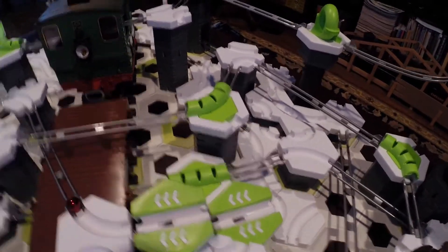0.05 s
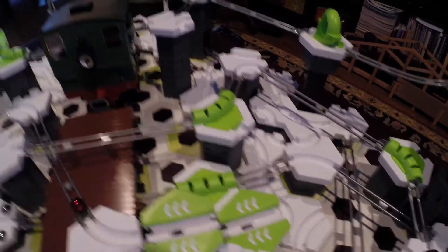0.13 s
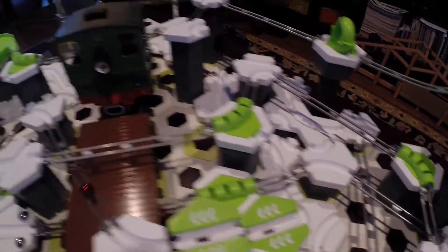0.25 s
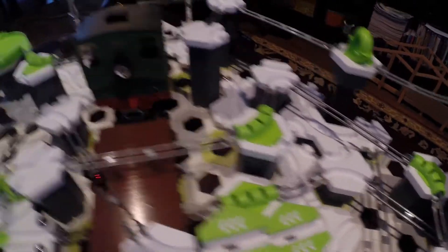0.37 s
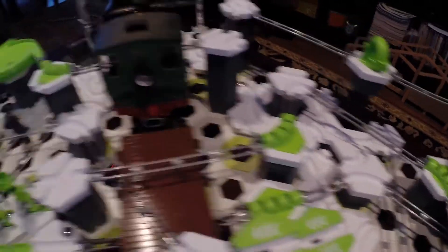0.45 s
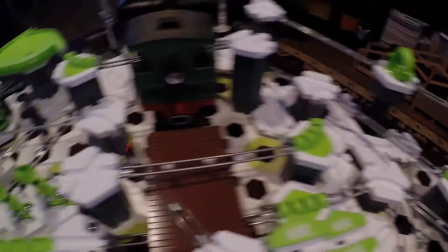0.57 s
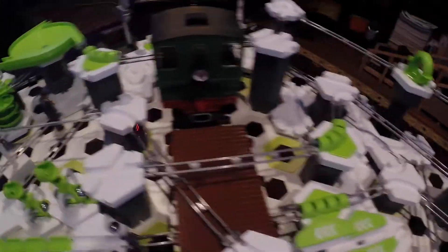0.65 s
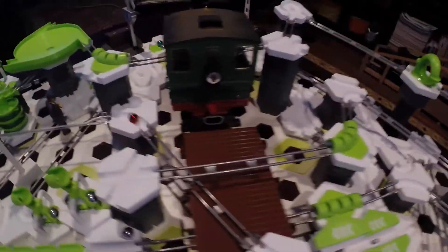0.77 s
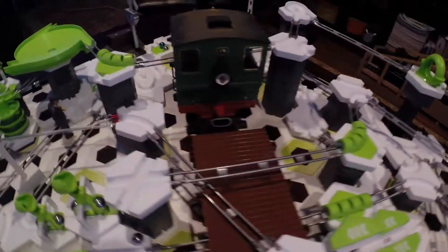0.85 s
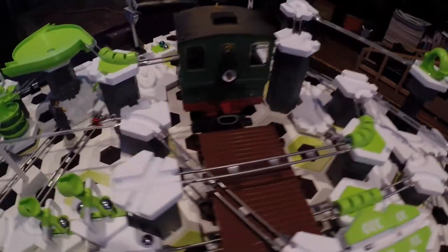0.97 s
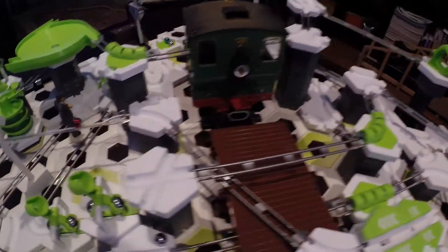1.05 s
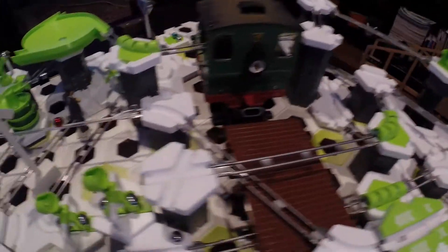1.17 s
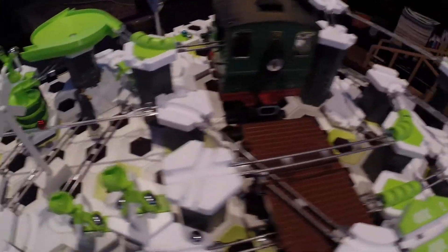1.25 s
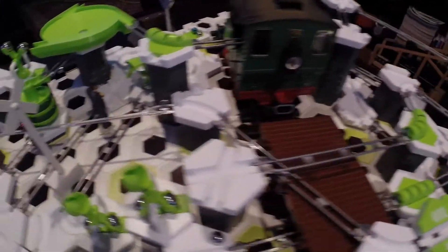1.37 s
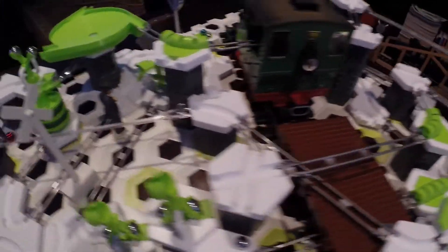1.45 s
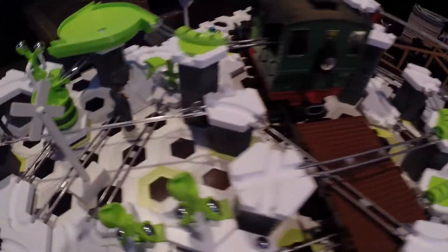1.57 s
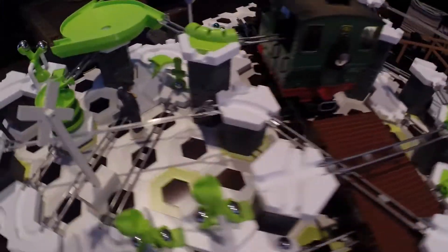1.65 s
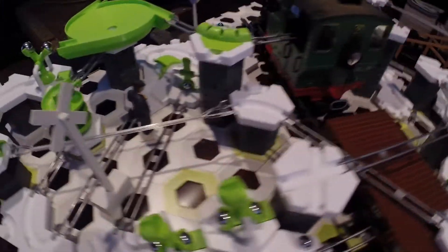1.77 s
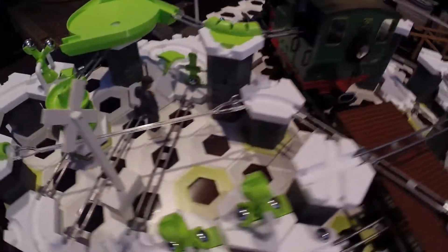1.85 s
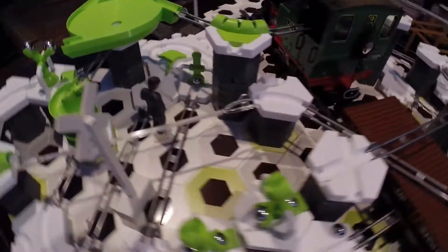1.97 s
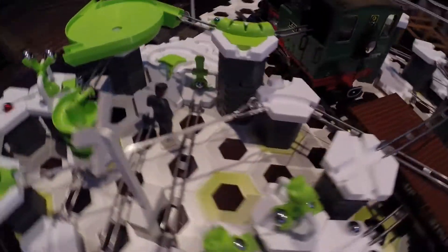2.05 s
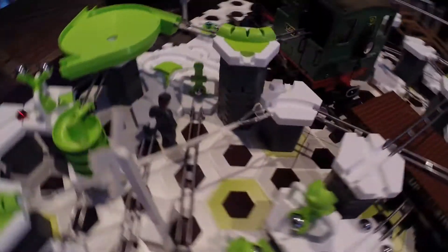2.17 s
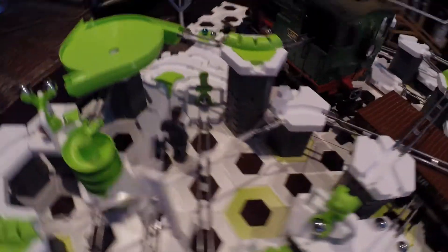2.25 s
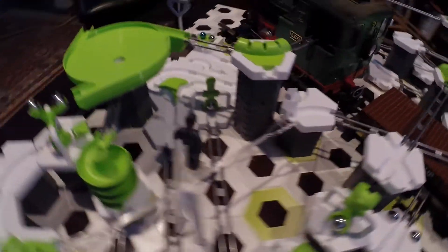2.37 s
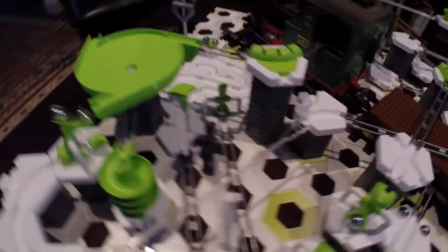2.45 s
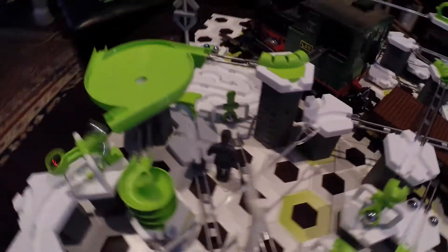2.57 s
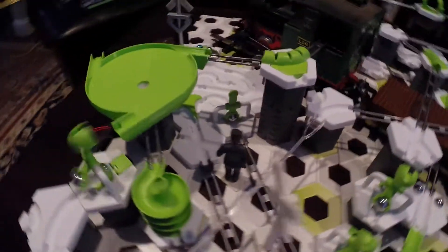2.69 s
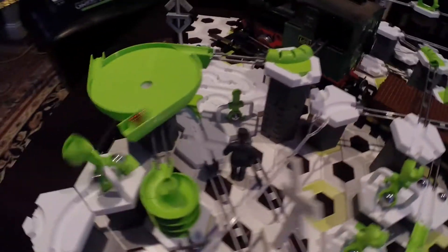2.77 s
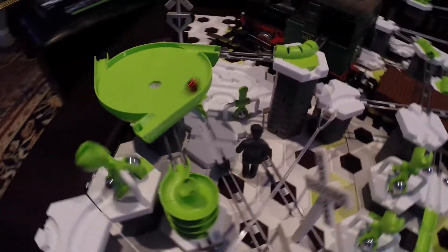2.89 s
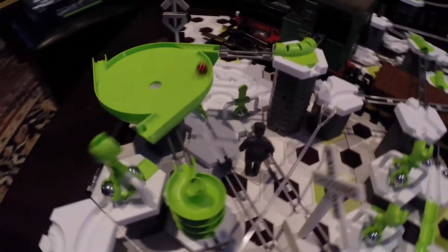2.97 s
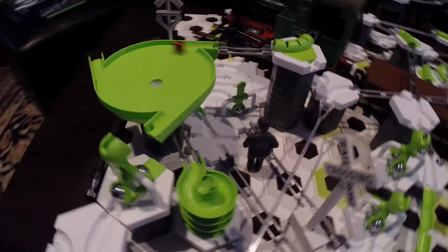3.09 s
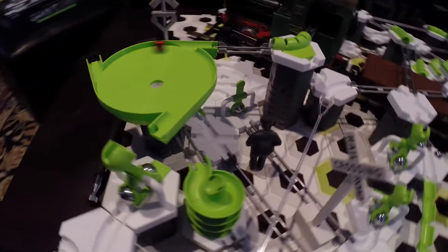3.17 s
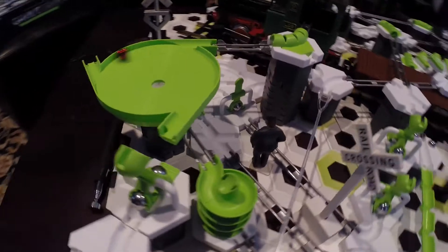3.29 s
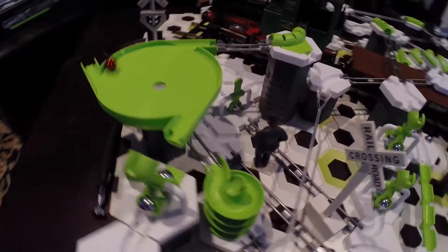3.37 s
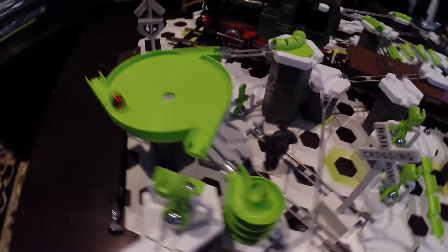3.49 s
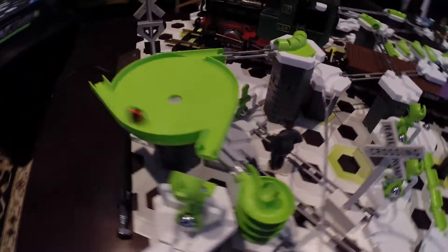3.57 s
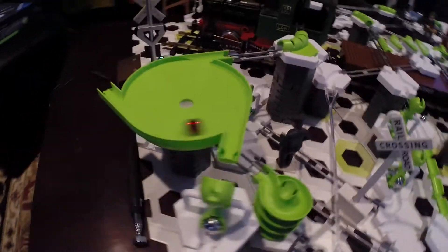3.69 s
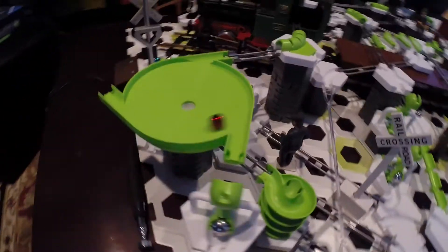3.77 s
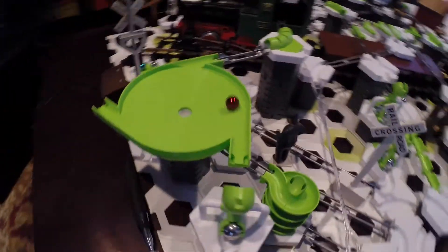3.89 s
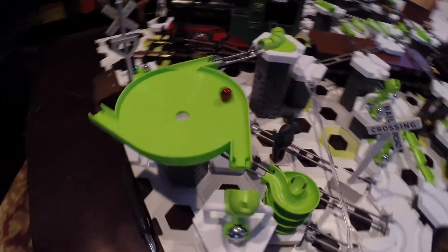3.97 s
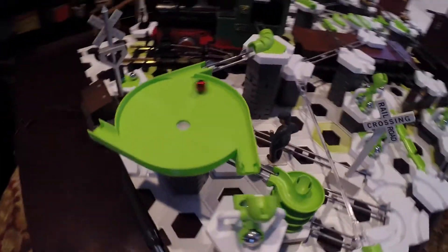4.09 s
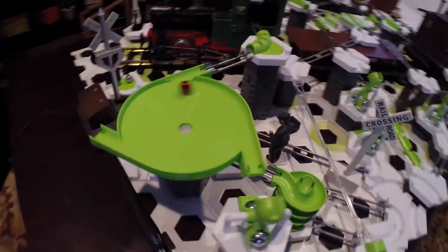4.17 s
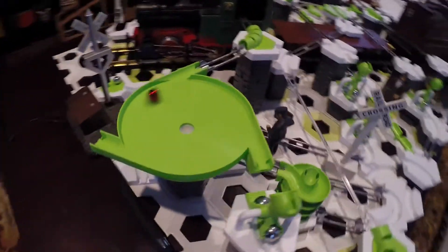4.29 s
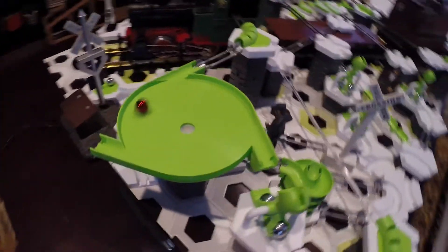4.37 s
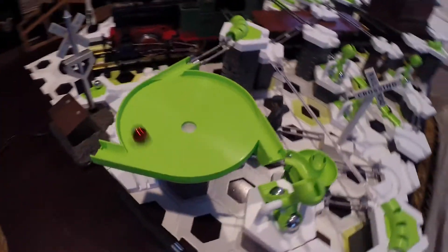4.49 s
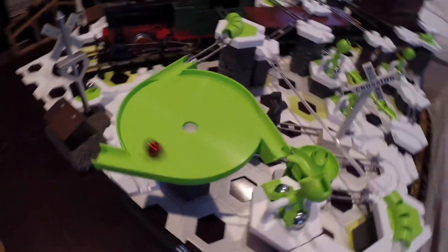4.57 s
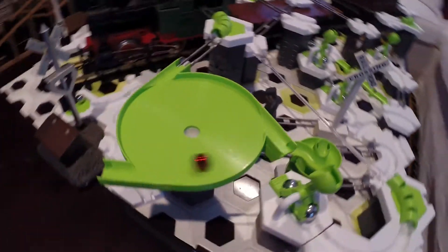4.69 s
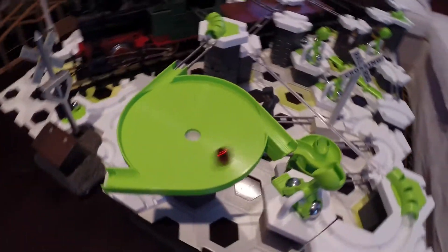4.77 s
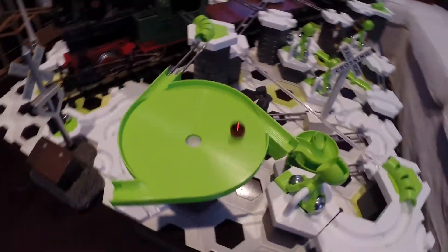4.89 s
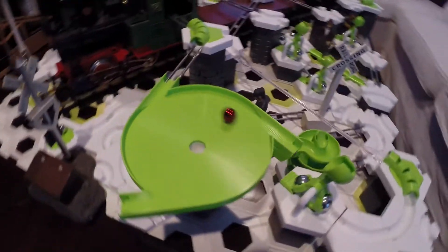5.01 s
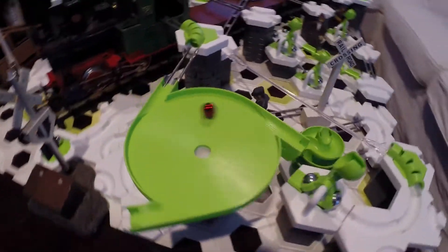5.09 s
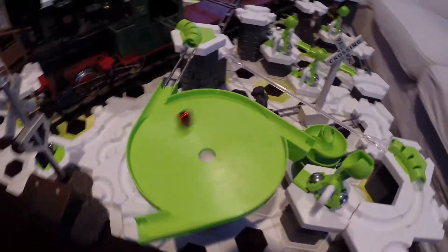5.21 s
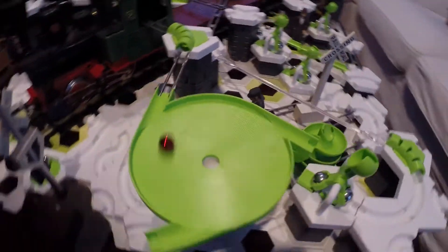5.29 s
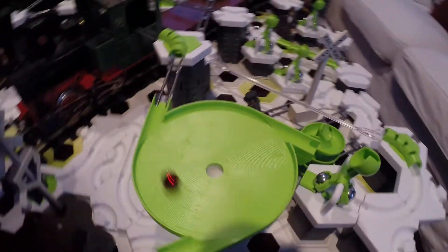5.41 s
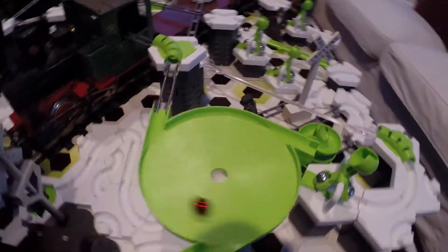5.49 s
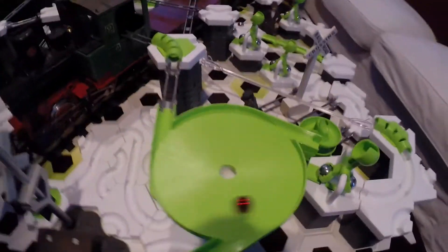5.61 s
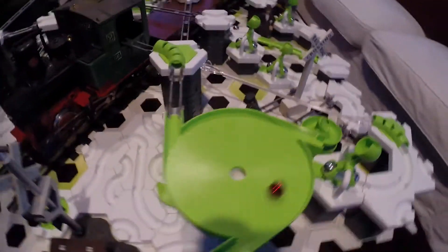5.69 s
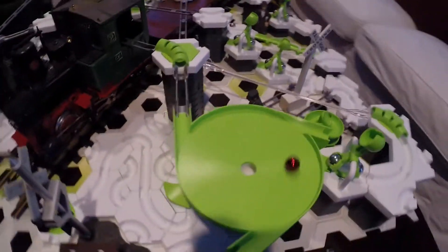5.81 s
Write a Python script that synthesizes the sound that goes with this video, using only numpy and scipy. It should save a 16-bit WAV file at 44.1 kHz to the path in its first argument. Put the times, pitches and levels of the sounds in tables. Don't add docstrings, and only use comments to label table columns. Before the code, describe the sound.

A quiet furnished room with faint low room tone and hiss, heard closely through a small camera microphone. From 0 to 0.9 s a marble rolls lightly over wire rails, with thin rattle and irregular hard clicks, the strongest near 0.15, 0.25 and 0.73 s. After one more click at 0.94 s it becomes a faint roll until about 1.6 s, when small dry taps cross plastic tiles. Between 2.25 and 2.8 s lifting arms clatter brightly, with a sharp snap at 2.39 s and small hollow thumps. At 2.81 s comes by far the loudest sound, a short dry crack into a plastic bowl. The marble then circles in a grainy whirr of rapid tiny skips, hollow bowl tone and thin ringing, roughest around 3.2 and 3.85 s, pulsing with each lap. It eases around 4.4 to 4.7 s, chatters again near 5 s, then continues more softly and less brightly to 6 s.

```python
import sys
import numpy as np
from scipy import signal
from scipy.fft import rfft, irfft
from scipy.io import wavfile
from scipy.ndimage import uniform_filter1d

SR = 44100
rng = np.random.default_rng(int(sys.argv[2]) if len(sys.argv) > 2 else 0)


def invert_db(x):
    u = np.asarray(x, float) / 20
    return 10 ** u


def store_pcm(level_fs):
    pcm = np.round(np.clip(level_fs, -1, 1) * 32767).astype(np.int16)
    wavfile.write(sys.argv[1], SR, np.atleast_2d(pcm).T)


N = 257984

# pitch_hz, density_db [dB per Hz]
AIR_SPECTRUM = [(12, -7), (20, 7.5), (134, -2), (444, -5.5), (821, -7.5), (918, -19.5), (1280, -6.5),
                (1560, -12), (2240, -17.5), (4030, -16), (5480, -22), (12300, -36.5), (15800, -38)]

# pitch_hz, width_hz, level_db
NEAR_RAIL_MODES = [(783, 79, -9), (1280, 180, -9.5), (1750, 120, 5), (2150, 33, 13.5), (2670, 140, 12),
                   (3900, 42, -22), (4700, 180, -7)]
FAR_RAIL_MODES = [(795, 28, -8.5), (1410, 610, -3.5), (2150, 300, -7), (3440, 110, -3), (4450, 83, -17),
                  (5630, 170, -4)]
TILE_MODES = [(770, 230, -1.5), (1420, 170, -3), (1640, 290, -4), (3670, 78, -11), (4940, 170, -32),
              (5820, 58, -30)]
ARM_MODES = [(2240, 95, -8), (3700, 330, 1), (4500, 110, -20), (7100, 900, -6)]
BODY_CHANGES_S = (0.88, 1.63, 1.836, 2.357)
# start_s, level_db
ROLLING_LEVEL = [(0.0, -50), (0.21, -62), (0.33, -58), (0.51, -53.5), (0.68, -53), (0.76, -52.5),
                 (0.9, -47), (1.0, -53.5), (1.5, -55.5), (1.77, -51), (2.0, -56.5), (2.28, -51),
                 (2.42, -53), (2.49, -63), (2.57, -59), (2.61, -83), (2.71, -72), (2.803, -59)]
# rumble_db, ring_db, fizz_db
ROLLING_COLOURS = [
    (2, 2, -12),
    (-6, -3, -11.5),
    (-2.5, -6, -2),
    (4, -3, -26),
    (9, -1, 10),
]

# start_s, peak_db, pitch_hz, extra_brightness_db
RAIL_JOINTS = [(0.0185, -32, 2140, -21), (0.0556, -31, 2080, -19), (0.1012, -37, 2010, 0),
               (0.1446, -23.5, 4300, -5), (0.173, -36.5, 2570, -3), (0.2418, -21, 2560, -2),
               (0.26, -27.5, 2150, -1), (0.2725, -27, 2710, -2), (0.355, -33, 2210, -5),
               (0.466, -34, 2300, -3), (0.494, -30.5, 2620, -13), (0.5216, -30, 2240, -12),
               (0.568, -36, 2150, 0), (0.6664, -32, 2160, -7), (0.724, -19.5, 2450, -4),
               (0.728, -17, 2150, -10), (0.7475, -20, 2240, -2), (0.7842, -27, 2250, 2),
               (0.8976, -36.5, 2550, 3), (0.9409, -22, 2240, 5.5), (0.949, -31.5, 2240, 21),
               (1.04, -40.5, 2240, 33), (1.296, -44, 3530, 42)]
TILE_EDGES = [(1.6458, -31.5, 1700, 5), (1.68, -28, 1550, 2), (1.686, -31.5, 2580, 3),
              (1.734, -36.5, 2670, 3), (1.766, -29.5, 2600, 8), (1.8031, -25, 3700, 2),
              (1.839, -33.5, 1570, 0), (1.887, -33, 1620, -19), (1.909, -37, 1640, -9),
              (1.938, -51, 1500, -9), (1.981, -39, 1720, -9), (2.036, -29.5, 865, 0),
              (2.089, -36.5, 1880, -10), (2.173, -39, 1490, -1)]
ARM_HITS = [(2.2458, -24.5, 3730, -18), (2.2618, -26, 2170, -4), (2.3417, -41.5, 3320, 27),
            (2.36, -18, 3480, -19), (2.364, -27.5, 3670, 9), (2.3895, -17.5, 3800, -5),
            (2.4104, -22, 3700, 2), (2.4207, -27, 3900, -4), (2.4292, -27, 3040, 1),
            (2.5026, -33.5, 3700, 0), (2.5125, -25, 1960, -11), (2.5143, -23.5, 3700, -14),
            (2.5443, -27, 3700, -9), (2.5592, -31, 6650, -2), (2.7252, -22, 3620, -0.5),
            (2.762, -30, 3540, 5), (2.775, -37, 2000, 21)]
# low_share_db [at -38.5 dB peak], high_share_db [at -28 dB peak], t60_s
KNOCK_TIMBRES = [
    (-10, -26.5, 0.096),
    (-11, -23, 0.087),
    (-7.5, -15, 0.074),
]
# start_s, peak_db, pitch_hz, t60_s
ARM_BASE_THUMPS = [(2.359, -32.5, 374, 0.039), (2.391, -38, 540, 0.075), (2.424, -37.5, 287, 0.048),
                   (2.515, -50, 395, 0.039), (2.522, -36, 562, 0.039), (2.551, -48, 500, 0.11)]
# start_s, peak_db, low_pitch_hz, high_pitch_hz, width_hz
CATCH_SNAP = (2.3893, -10, 3660, 4040, 260)

# start_s, peak_db
BOWL_LANDING = [(2.8116, -.5)]
# pitch_hz, level_db, t60_s
BOWL_LANDING_MODES = [(145, -31.5, 0.51), (754, 2.5, 0.014), (990, -15, 0.041), (1130, -30, 0.2),
                      (1610, -6.5, 0.036), (1686, -7, 0.062), (2000, -40, 0.049), (2740, 0, 0.043),
                      (2550, 7.5, 0.016), (2920, 12.5, 0.018), (2880, -42, 0.039), (3410, 2, 0.035),
                      (3530, -1, 0.035), (5240, -22, 0.04), (4390, 14, 0.012), (6000, -17, 0.059),
                      (6730, -11, 0.026), (7870, -12, 0.044)]

# pitch_hz, width_hz, level_db
DISH_MODES = [(473, 150, 4), (720, 25, 3), (778, 56, 4.5), (961, 31, 10), (1042, 63, 7.5), (1490, 330, 4.5)]
RING_MODES = [(1704, 94, 9), (1737, 165, 0.78)]
RIM_MODES = [(2386, 140, -4), (2478, 46, 3.5), (2608, 75, 2), (2710, 145, -2), (2010, 1100, -15),
             (2860, 260, -5.5), (3170, 85, -4.5), (3310, 71, -10), (3535, 87, -6.5)]
FIZZ_MODES = [(4160, 150, 1), (8750, 350, -10), (4446, 124, -2), (5310, 100, -4), (5830, 99, -12.5),
              (6170, 85, -7.5), (6910, 380, -8.5), (7440, 890, -9.5), (8050, 660, -15), (9850, 700, -19.5),
              (6840, 2200, -2)]
TOWER_MODES = [(130.5, 32, 3), (157, 18, -1), (240.5, 9.2, -15)]
# start_s, level_db
RIM_PRESSURE = [(2.9, -38), (3.07, -37), (3.3, -39), (3.47, -41), (3.62, -39.5), (3.75, -41.5),
                (3.86, -41.5), (4.02, -48), (4.12, -44), (4.48, -45), (4.66, -51), (4.76, -40), (5.04, -42),
                (5.13, -43.5), (5.25, -38.5), (5.58, -46), (5.68, -47.5), (5.8, -38.5)]
# level_db, slope [dB per dB of pressure], drift [dB per s]
DISH_FOLLOW = (-41.5, 0.26, 0.6)
RING_FOLLOW = (-37, 0.74, 0.09)
FIZZ_FOLLOW = (-57.5, 1.17, -0.36)
STILL_LINE_TIMES_S = (2.62, 2.89, 3.13, 3.46, 3.84, 4.3, 4.62, 4.96, 5.32, 5.64, 6.0)
SPIRAL_DRIFT = -3.0, -2.5, 2.2
JOLTS_S = (3.204, 3.407, 3.468, 3.488, 3.833, 3.929, 4.066, 4.241, 4.314, 4.601, 4.949, 5.146, 5.248, 5.309,
           5.826)
# start_s, thud_db, rim_ring_db
SPIRAL_HOPS = [(2.8702, -20, -46), (2.8737, -39, -43), (2.9282, -35, -31), (2.9401, -28, -27),
               (2.951, -49, -34), (2.995, -44, -36), (2.999, -29.5, -47), (3.0135, -39, -38),
               (3.0189, -33, -28), (3.0236, -33, -40), (3.0277, -23.5, -25.5), (3.0467, -32, -23),
               (3.0595, -42, -22), (3.064, -35, -44), (3.075, -32, -26), (3.0818, -22.5, -20),
               (3.0863, -23, -26.5), (3.0913, -24, -31), (3.0961, -23, -53), (3.1189, -21.5, -26),
               (3.1331, -23, -48), (3.1492, -24, -29), (3.157, -20, -39), (3.2005, -23, -27.5),
               (3.2064, -17.5, -21.5), (3.2114, -25, -30), (3.2199, -14.5, -12.5), (3.2239, -36, -21),
               (3.23, -28, -48), (3.2489, -31.5, -26), (3.2582, -19, -17), (3.2707, -42, -30.5),
               (3.2747, -25, -32), (3.2954, -31, -27.5), (3.3066, -29, -23), (3.3149, -24, -24),
               (3.3213, -39, -33), (3.3253, -27, -25.5), (3.333, -22, -22), (3.3405, -21, -51),
               (3.3443, -28, -28.5), (3.4085, -22.5, -44.5), (3.4168, -34, -25), (3.4392, -27, -32),
               (3.4899, -26, -53), (3.5192, -21, -29), (3.5323, -25, -35), (3.5396, -36, -31),
               (3.5516, -35, -43), (3.6023, -36, -39), (3.62, -41, -35), (3.624, -22, -28),
               (3.628, -34, -34), (3.6321, -30, -35), (3.6556, -26, -41), (3.6609, -27, -34),
               (3.6766, -26.5, -30.5), (3.7876, -26, -30), (3.804, -28, -28), (3.8354, -18.5, -15.5),
               (3.843, -22.5, -26), (3.8469, -25.5, -33), (3.8538, -19, -23), (3.8568, -27.5, -47),
               (3.861, -25, -28), (3.865, -22.5, -35), (3.8714, -28, -24), (3.873, -23, -27),
               (3.8777, -22, -27.5), (3.8839, -31, -27), (3.888, -25, -35), (3.892, -31, -28),
               (3.8957, -22, -35), (3.8995, -30, -38), (3.9042, -33, -38), (3.9299, -23, -28.5),
               (3.9328, -26, -47), (3.9486, -29, -32), (3.9513, -46, -32.5), (4.005, -27.5, -31.5),
               (4.0662, -34, -30.5), (4.0836, -39, -43), (4.0849, -26, -22.5), (4.0891, -27, -51),
               (4.0951, -28, -49), (4.0976, -31, -25), (4.1122, -22.5, -26), (4.1191, -26.5, -31),
               (4.147, -32, -41), (4.1565, -23.5, -28), (4.2118, -29, -53), (4.2415, -22.5, -28),
               (4.2667, -22, -27), (4.3162, -30, -35), (4.3214, -21.5, -32), (4.3256, -32, -26),
               (4.3328, -20.5, -32), (4.3395, -26.5, -36), (4.3439, -25, -25.5), (4.3479, -21, -31.5),
               (4.351, -25, -25), (4.3546, -21, -23), (4.357, -25, -37), (4.3731, -31, -33),
               (4.4676, -31, -37), (4.4844, -35.5, -31), (4.4868, -22.5, -32.5), (4.497, -33, -31),
               (4.5641, -28, -39), (4.603, -39, -37), (4.7147, -34, -38), (4.7719, -26, -25.5),
               (4.793, -25, -36), (4.822, -46, -36), (4.879, -24, -37), (4.888, -39, -34),
               (4.9112, -24, -32), (4.9497, -23.5, -21.5), (4.956, -22.5, -21.5), (4.9615, -27, -32.5),
               (4.9675, -21, -34), (4.9721, -21, -32), (4.9773, -22, -50), (4.9816, -23, -32),
              (4.9897, -23, -32), (4.9939, -22, -32), (4.9985, -22, -35), (5.0059, -23, -33),
              (5.01, -22, -30), (5.014, -22, -29), (5.0199, -22, -37), (5.0247, -22, -27),
              (5.0305, -19, -35), (5.0365, -20, -24), (5.0423, -19, -50), (5.0493, -19, -27),
              (5.0541, -26, -26), (5.0734, -21, -29), (5.0907, -22, -29), (5.1472, -21, -28),
              (5.1512, -25, -42), (5.2001, -23, -32), (5.2088, -25, -40), (5.2131, -22, -27),
              (5.2183, -22, -30), (5.2413, -24, -40), (5.2495, -22, -27), (5.2544, -24, -32),
              (5.2594, -25, -38), (5.2935, -25, -50), (5.3099, -21, -29), (5.3144, -23, -37),
              (5.364, -25, -40), (5.3775, -34, -32), (5.3893, -25, -50), (5.4017, -23, -35),
              (5.4117, -23, -37), (5.467, -24, -45), (5.4946, -25, -37), (5.5167, -24, -38),
              (5.5301, -27, -35), (5.5338, -25, -50), (5.5375, -22, -32), (5.5426, -24, -38),
              (5.5511, -29, -34), (5.592, -26, -40), (5.605, -24, -37), (5.6083, -25, -40),
              (5.6268, -27, -44), (5.6357, -25, -42), (5.6404, -36, -35), (5.6441, -26, -38),
              (5.7497, -25, -40), (5.7884, -26, -40), (5.7967, -25, -39), (5.802, -26, -36),
              (5.8061, -26, -37), (5.8269, -24, -41), (5.8346, -25, -35), (5.8416, -28, -35),
               (4.41, -36, -47), (4.439, -50, -55), (4.475, -22, -34), (4.518, -30, -34.5),
             (4.5285, -38, -31), (4.5677, -25, -43), (4.6074, -25.5, -40), (4.6395, -28, -37),
             (4.6992, -40, -57), (4.723, -31, -31), (4.7393, -40, -34), (4.7613, -24, -34),
             (4.7774, -34, -29), (4.7953, -31, -30), (4.829, -27, -34), (4.856, -27, -34),
             (4.8635, -42, -33), (4.8903, -26, -28), (4.8926, -17, -44), (4.9281, -26.5, -33),
             (4.9848, -29, -33), (5.001, -27.5, -40), (5.0785, -24, -37), (5.0945, -24.5, -48),
             (5.19, -33, -32), (5.1955, -21.5, -32), (5.2722, -33, -39), (5.2908, -20.5, -34),
             (5.302, -29, -35), (5.349, -26, -39), (5.3735, -23, -35), (5.394, -35, -30.5),
             (5.4228, -24, -37), (5.44, -38, -40), (5.528, -31, -29.5), (5.566, -29, -37),
             (5.7129, -29, -32), (5.7298, -24.5, -47), (5.7585, -32, -42), (5.7688, -40, -31.5)]
IN_BOWL_S = 2.84

# start_s, peak_db, pitch_hz
SETTLING_TICKS = [(2.945, -40.5, 7960), (3.044, -40, 8350), (3.0698, -32, 7900), (3.074, -44, 12000),
                  (3.1822, -49, 13500), (3.208, -35.5, 7860), (3.222, -51, 11880), (3.403, -47, 8700),
                  (4.4417, -46, 12500), (4.498, -39.5, 7000)]


def level(x, db):
    return x * invert_db(db) / np.sqrt(np.mean(x ** 2))


def peak(x, db):
    return x * invert_db(db) / np.abs(x).max()


def add(out, s, sound):
    i = int(s * SR)
    out[i:i + len(sound)] += sound[:N - i]


def curves(table):
    s, *columns = np.transpose(table)
    return [np.interp(np.arange(N) / SR, s, c) for c in columns]


def walk(rate):
    k = int(SR / rate)
    held = np.repeat(rng.standard_normal(N // 20)[:N // k + 1], k)
    return 2.7 * uniform_filter1d(uniform_filter1d(held, k), k)[:N]


def decay_width(t60):
    return np.log(1000) / np.pi / t60


def mode(x, hz, width):
    pole = np.exp((2j * hz - width) * np.pi / SR)
    return signal.lfilter([1], [1, -pole], x).imag


def soften(x, contact_s):
    keep = np.exp(-1 / (contact_s * SR))
    return signal.lfilter([(1 - keep) ** 2], [1, -2 * keep, keep ** 2], x)


def ring(force, db, modes, wander_db, wander_rate, blows=0, fade_db=0, grow_db=0):
    gains = [(-1) ** k * invert_db(m[2]) * np.sqrt(m[1]) for k, m in enumerate(modes)]
    power = sum(g ** 2 * SR / (4 * np.pi * m[1]) for g, m in zip(gains, modes))
    drive = force * invert_db(db) / np.sqrt(power) + blows / np.sqrt(np.sum(np.square(gains)))
    out = 0
    for k, (gain, (hz, width, _)) in enumerate(zip(gains, modes)):
        drift_db = fade_db * (k < 2) + grow_db * (k == 2)
        out = out + gain * mode(drive * invert_db(wander_db * walk(wander_rate) + drift_db), hz, width)
    return out


def air():
    hz = np.fft.rfftfreq(N, 1 / SR)
    table_hz, table_db = np.transpose(AIR_SPECTRUM)
    shape = invert_db(np.interp(np.log(hz + 1), np.log(table_hz), table_db))
    return level(irfft(rfft(rng.standard_normal(N)) * shape, N), -57)


def skips(rate, uneven, scatter_db, grit_db):
    chance = rng.standard_normal((N // 40, 2))
    turns = np.cumsum(rate) / SR
    gaps = np.exp(uneven * chance[:, 0] - uneven ** 2 / 2)
    at = np.searchsorted(turns, np.cumsum(gaps))
    force = np.zeros(N + 1)
    np.add.at(force, at, invert_db(scatter_db * chance[:, 1]))
    return level(force[:N], 0) + invert_db(grit_db) * rng.standard_normal(N)


def track():
    level_db, = curves(ROLLING_LEVEL)
    s = np.arange(N) / SR
    force = skips(np.full(N, 260.), uneven=.6, scatter_db=3, grit_db=-4) * invert_db(1.7 * walk(30))
    force = 1.94 * soften(force, .00002)
    bodies = (NEAR_RAIL_MODES, FAR_RAIL_MODES, TILE_MODES, TILE_MODES, ARM_MODES)
    edges = (0, *BODY_CHANGES_S, ROLLING_LEVEL[-1][0])
    out = 0
    for body, shares, start, end in zip(bodies, ROLLING_COLOURS, edges, edges[1:]):
        here = force * (s >= start) * (s < end)
        for db, lo, hi in zip(shares, (0, 1600, 3300), (1600, 3300, SR)):
            modes = [m for m in body if lo <= m[0] < hi]
            broad = [(min(max(lo, 500) * 1.59, 4200), 1.32 * max(lo, 900), -7)]
            out = out + ring(here, level_db + db - 8.5, modes + broad, 0.31, 14.42)
    return out


def knocks():
    out, t = np.zeros(N), np.arange(SR // 5) / SR
    steps = np.linspace(-1, 1, 8)
    parts = zip((RAIL_JOINTS, TILE_EDGES, ARM_HITS), KNOCK_TIMBRES)
    rows = [(*knock, *timbre) for part, timbre in parts for knock in part]
    seeds = rng.integers(1 << 30, size=99)
    for (s, db, hz, bright_db, low_db, high_db, t60), seed in zip(rows, seeds):
        low_db = low_db - 0.4539 * (db + 38.5)
        high_db = high_db + 1.2 * (db + 28.0) + bright_db
        mid_db = -6.5 + .5 * min(bright_db, 0)
        own = np.random.default_rng(seed)
        rattle = own.standard_normal(len(t)) * np.exp(-np.log(1000) * t / np.clip(t60, .005, .2))
        push = soften(.055 * rattle + (t == 0), .00002)
        table = mode(push, 150, 27) + .5 * mode(push, 190, 140)
        add(out, s, peak(table, db + low_db - 8.0))
        for centre_hz, spread, share_db in ((717, 0.678, low_db), (3410, 0.45, mid_db), (7000, 0.557, high_db)):
            pitches = centre_hz * np.exp(spread * steps + 0.089 * own.standard_normal(8))
            part = sum((-1) ** k * mode(push, f, 50 + .075 * f) for k, f in enumerate(pitches))
            add(out, s, peak(part, db + share_db))
        main = mode(push, hz, .11 * hz) + mode(push, 1.05 * hz, .11 * hz)
        add(out, s, peak(main, db - 5.5))
    return out


def arm_thumps():
    out, blow = np.zeros(N), np.eye(1, SR // 5)[0]
    for s, db, hz, t60 in ARM_BASE_THUMPS:
        add(out, s, invert_db(db) * mode(blow, hz, decay_width(t60)))
    return out


def catch_snap():
    out, blow = np.zeros(N), np.eye(1, SR // 5)[0]
    s, db, low_hz, high_hz, width = CATCH_SNAP
    add(out, s, peak(mode(blow, low_hz, width) - mode(blow, high_hz, width), db))
    return out


def landing():
    (s, db), t = BOWL_LANDING[0], np.arange(SR // 2) / SR
    push = np.zeros(len(t))
    for delay_s, size in ((0, 0.53), (.00065, 1), (.0085, .4), (.02, 0.18)):
        push[int(delay_s * SR)] = size
    rattle = rng.standard_normal(len(t)) * np.exp(-t / 0.023)
    push = soften(push + 0.026 * rattle, .00002)
    body = 0
    for k, (hz, mode_db, t60) in enumerate(BOWL_LANDING_MODES):
        body = body + (-1) ** k * invert_db(mode_db) * mode(push, hz, decay_width(t60))
    crack = 7 * mode(push, 3520, 450) + 3 * mode(push, 3000, 660) + 0.27 * mode(push, 6200, 4000)
    out = np.zeros(N)
    add(out, s, peak(body + crack, db))
    return out


def hops(high_gap_s, low_gap_s, uneven, scatter_db):
    bounce_lasts_s = .032
    force = np.zeros((3, N))
    chance = rng.standard_normal((260, 2, 60))
    rows = [(IN_BOWL_S, -90, -90)] + sorted(SPIRAL_HOPS)
    ends = [row[0] for row in rows[1:]] + [N / SR]
    shrink = np.exp(-np.arange(60) * high_gap_s / (2 * bounce_lasts_s))
    gaps = low_gap_s + (high_gap_s - low_gap_s) * shrink
    for (s, thud_db, rim_db), end, (late, size) in zip(rows, ends, chance):
        after = np.cumsum(gaps * np.exp(uneven * late))
        keep = s + after < end - .003
        heights = invert_db(scatter_db * size) * (0.2 + 0.3 * np.exp(-after / 0.0074))
        force[0, ((s + after[keep]) * SR).astype(int)] = heights[keep]
        force[1:, int(s * SR)] = invert_db(thud_db), invert_db(rim_db)
    return force


def thud(landings, narrow_s, wide_s, lead_s):
    t = np.arange(-90, 91) / SR
    swell = np.exp(-((t + lead_s) / wide_s) ** 2) * narrow_s / wide_s
    spike = np.exp(-(t / narrow_s) ** 2)
    return signal.fftconvolve(landings, swell - spike, "same")


def bowl_levels():
    s, (rim_db,) = np.arange(N) / SR, curves(RIM_PRESSURE)
    lull_db, lull_s, still_db = -6, .014, -20
    for at_s in JOLTS_S:
        rim_db = rim_db + lull_db * np.exp(-np.abs(at_s - s) / lull_s) * (s < at_s)

    def follow(db, slope, drift):
        return db + slope * (rim_db + 44.0) + drift * (s - IN_BOWL_S)

    angle = np.pi * np.interp(s, STILL_LINE_TIMES_S, np.arange(len(STILL_LINE_TIMES_S)))
    lobes_db = 10 * np.log10(np.sin(angle) ** 2 + invert_db(still_db) ** 2)
    return follow(*DISH_FOLLOW), follow(*RING_FOLLOW) + lobes_db, rim_db, follow(*FIZZ_FOLLOW), lobes_db


def bowl():
    dish_db, ring_db, rim_db, fizz_db, lobes_db = bowl_levels()
    rim_fade_db, fizz_fade_db, rim_grow_db = np.outer(SPIRAL_DRIFT, np.arange(N) / SR - 4.0)
    small, low, mid = hops(high_gap_s=.0052, low_gap_s=.0037, uneven=.22, scatter_db=3)
    grit = rng.standard_normal(N) * invert_db(1.8 * walk(45)) * (np.arange(N) > IN_BOWL_S * SR)
    force = level(small, -3) + invert_db(-10) * grit
    landings = small * invert_db(dish_db + 18) + low * invert_db(0.3)
    thumps = thud(landings, narrow_s=.0002, wide_s=.00052, lead_s=.00012)
    dish = ring(force, dish_db - 8.5, DISH_MODES, 1.4, 9, low * invert_db(-20))
    rim = ring(force, ring_db - 8.5, RING_MODES, 1.2, 40, low * invert_db(lobes_db - 5))
    rim = rim + ring(force, rim_db - 5.5, RIM_MODES, 1.3, 18, mid * invert_db(-1), rim_fade_db, rim_grow_db)
    tower = ring(force, dish_db - 16.0, TOWER_MODES, 2.3, 9.2, low * invert_db(-25.5))
    chatter = soften(mid + .5 * low, .003)
    scrape = .45 * force + invert_db(-7) * grit * (.4 + .75 * level(chatter, 0) ** .7)
    fizz = ring(scrape, fizz_db - 3, FIZZ_MODES, 1.9, 12, (mid + .4 * low) * invert_db(-24), fizz_fade_db)
    fizz = soften(soften(fizz, .000017), .000015)
    return thumps + tower + 1.3 * soften(dish + rim, .00003) + 2.2 * fizz


def ticks():
    out, t = np.zeros(N), np.arange(SR // 10) / SR
    for s, db, hz in SETTLING_TICKS:
        puff = rng.standard_normal(len(t)) * np.exp(-t / 0.0025)
        puff = mode(mode(puff, hz, 0.39 * hz), hz, 0.39 * hz)
        add(out, s, peak(puff, db))
    return out


def walls(near):
    t = np.arange(SR // 2) / SR
    tail = rng.standard_normal(len(t)) * np.exp(-np.log(1000) * t / 0.14) * (t > .004)
    tail = mode(tail, 810, 3100)
    return signal.fftconvolve(near, tail * invert_db(-19) / np.sqrt(np.sum(tail ** 2)))[:N]


def scene():
    near = track() + knocks() + arm_thumps() + catch_snap() + landing() + bowl() + ticks()
    near = signal.sosfilt(signal.butter(2, 90, "high", fs=SR, output="sos"), near)
    return (near + walls(near) + air())[None]


def top_cut(x):
    return signal.sosfilt(signal.butter(12, 16000, fs=SR, output="sos"), x)


def record(dry):
    cut = signal.sosfilt(signal.ellip(8, .2, 60, 15200, fs=SR, output="sos"), dry)
    return top_cut(cut)


dry = scene()
out = record(dry)
store_pcm(out)
```